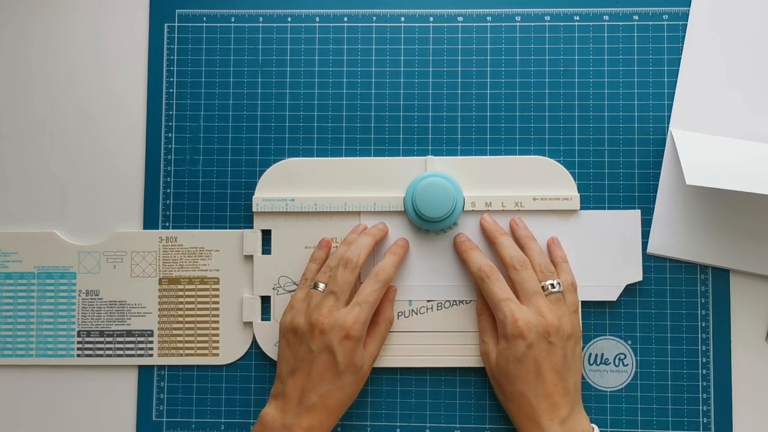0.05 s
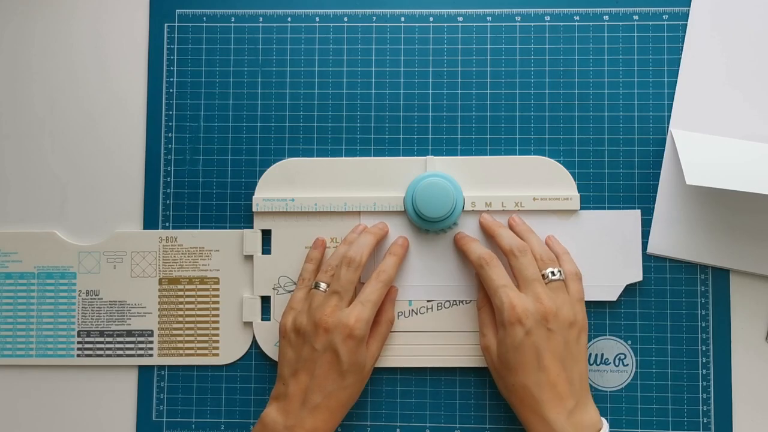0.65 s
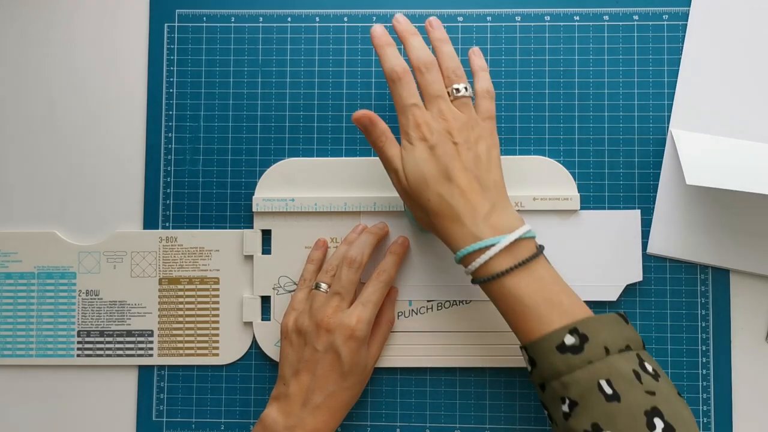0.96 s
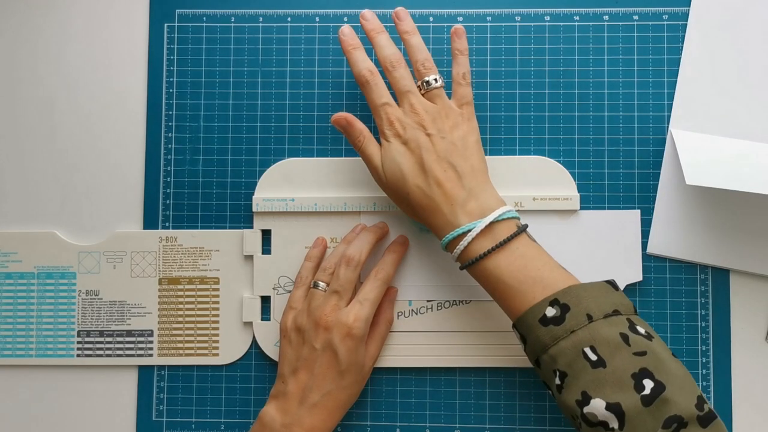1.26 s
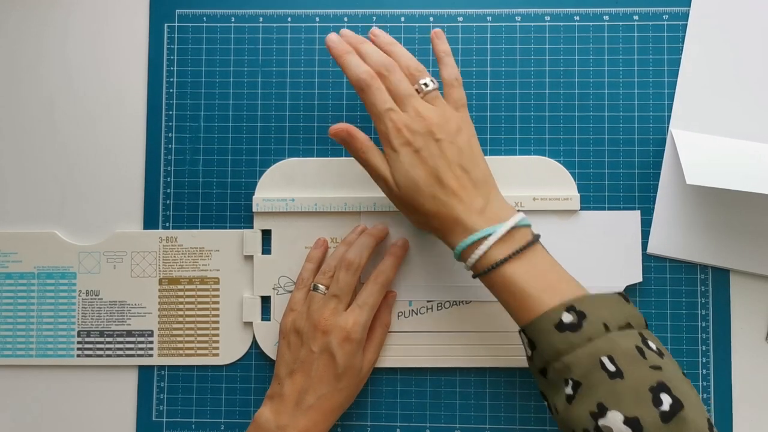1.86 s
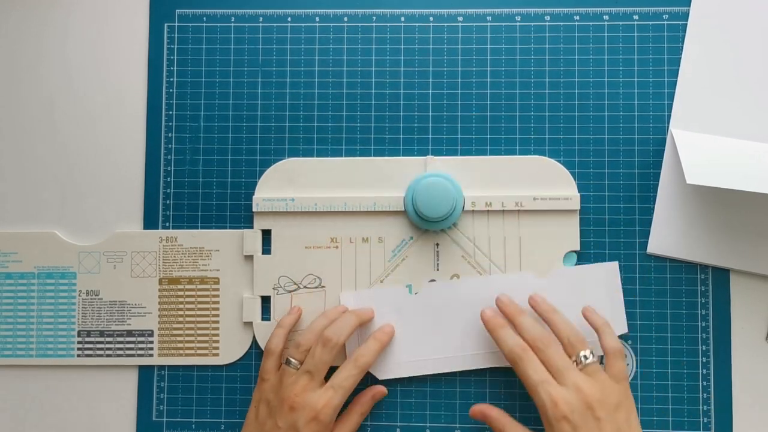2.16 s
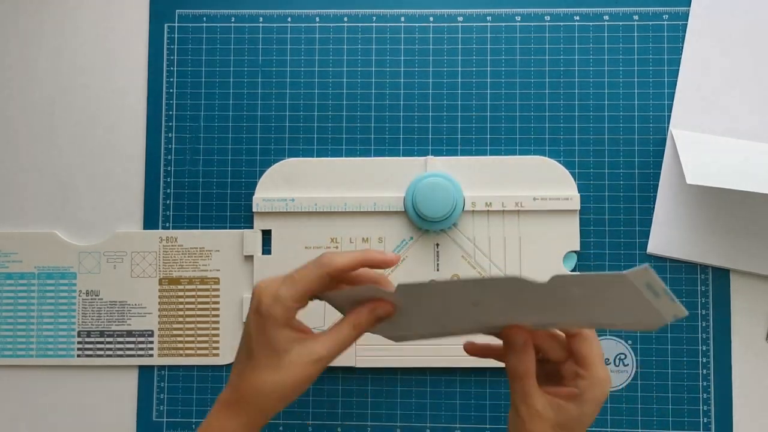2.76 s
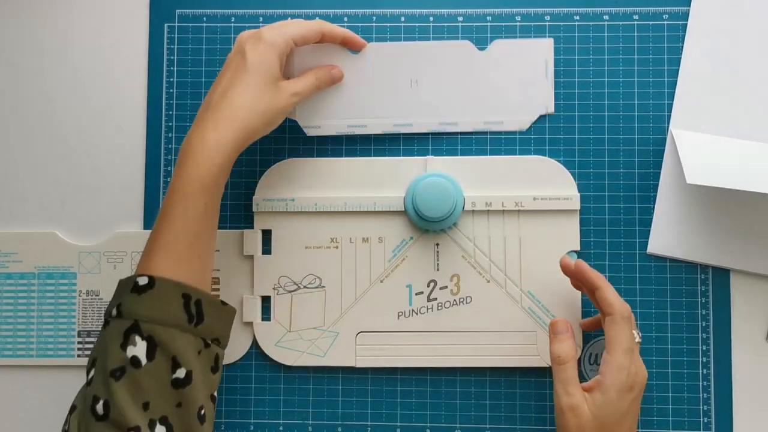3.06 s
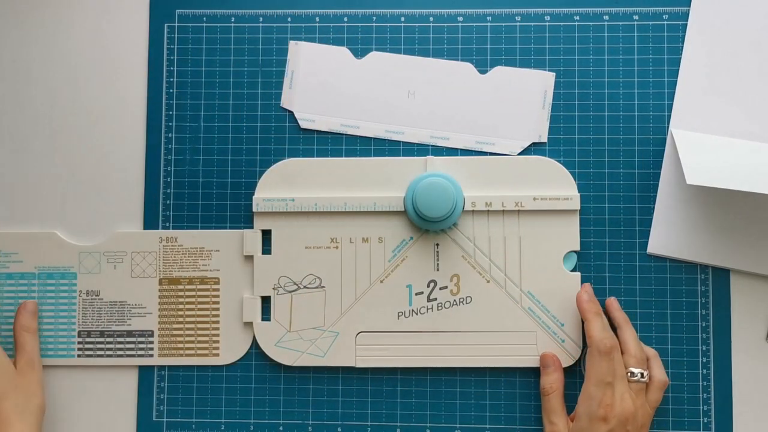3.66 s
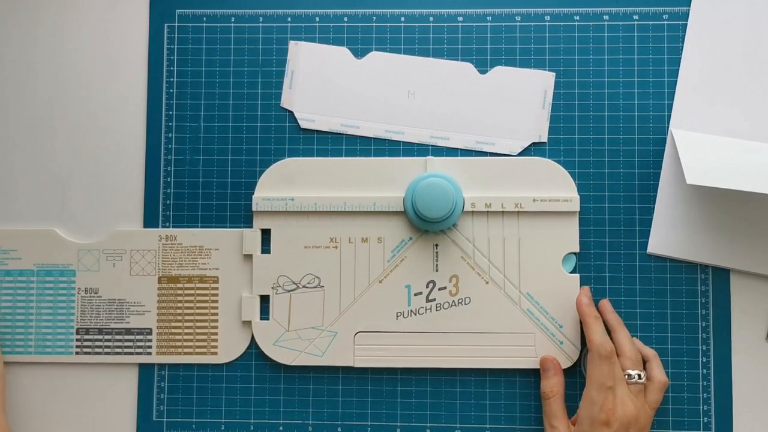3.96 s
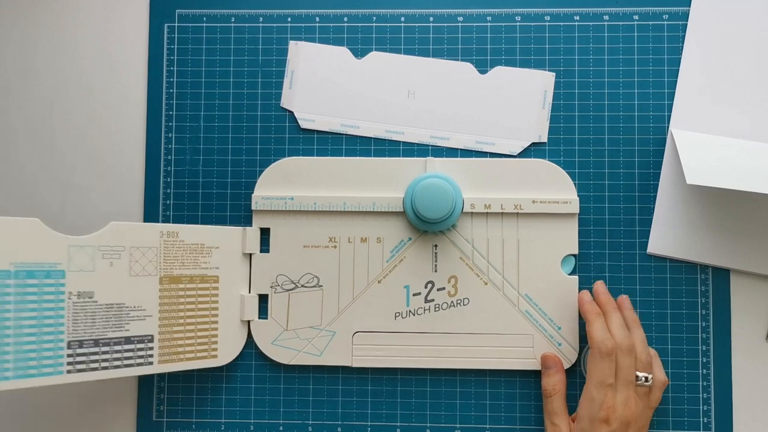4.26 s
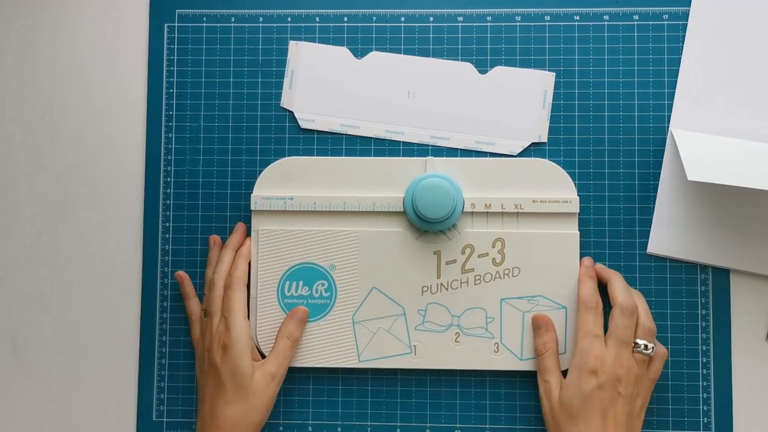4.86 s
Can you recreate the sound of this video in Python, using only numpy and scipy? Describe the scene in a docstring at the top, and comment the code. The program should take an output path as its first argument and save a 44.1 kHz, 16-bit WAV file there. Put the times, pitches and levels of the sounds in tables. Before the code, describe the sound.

A sharp plastic punch snap and table thump, followed by sliding paper and a lid clapping and clicking closed.

```python
"""A plastic craft punch board on a table in a small room, heard from close above, over a faint motor hum.
The punch is pressed and snaps through cardstock (1.7 s): a click, a ring of the board, a table thump.
A spring throws its hollow button back (2.0 s). The card slides out, is laid down and pushed along the
mat (2.1-3.4 s), hissing and scraping as its fibres catch. The hinged flap is swung over, claps shut
(4.7 s) and clicks into its catch (4.8 s)."""
import sys
import numpy as np
from scipy import signal
from scipy.fft import rfft, irfft
from scipy.io import wavfile

SR = 44100
rng = np.random.default_rng(int(sys.argv[2]) if len(sys.argv) > 2 else 0)


def wav_record(signal):
    """Record a signal, one row per channel, as 16-bit PCM in the file named by sys.argv[1]."""
    frames = np.transpose(np.atleast_2d(signal))
    bounded = np.clip(frames, -1, 1)
    # unit amplitude maps onto the largest positive 16-bit level
    quanta = np.round(bounded * 32767).astype(np.int16)
    wavfile.write(sys.argv[1], SR, quanta)


N = 225703
TIME_S = np.arange(N) / SR
HIT_TIME_S = TIME_S[:SR // 2]

# room tone: f/Hz, relative density/dB
AIR_SPECTRUM = [(12, -35), (20, -5.5), (37, 1.5), (88, -14.5), (101, -4.5), (123, -13), (241, -16.5),
                (262, -18.5), (301, -16.5), (446, -21.5), (527, -20), (873, -26.5), (1370, -34.5),
                (1610, -34), (16000, -58)]
# distant motor: f/Hz, level/dB
MOTOR_HUM = [(118.4, -63.5), (177.6, -70.5), (301.5, -80)]
# reverberation decay: f/Hz, t60/s
REVERB_T60 = [(100, 0.38), (400, .5), (1500, 0.49), (5000, 0.18), (9000, 0.55), (15000, 0.32)]
# reverberation colour: f/Hz, relative density/dB
REVERB_SPECTRUM = [(60, -8.5), (150, -7), (400, -1.5), (900, -6.5), (1500, -2.5), (2300, -1), (5000, 0.5),
                   (10000, -8), (16000, 6)]
# left-right coherence of room, clicks and ticks: f/Hz, coherence
ROOM_COHERENCE = [(25, 0.26), (70, 0.62), (200, 0.89), (500, 0.58), (1000, 0.071), (2000, 0.08),
                  (15000, 0.034)]
CLICK_COHERENCE = [(400, 0.85), (1500, 0.35), (8000, 0.26)]
TICK_COHERENCE = [(1000, 0.25), (8000, 0.2)]
# microphone port resonances: f/Hz, left/dB, right/dB
MIC_PORTS = [(3230, 3.5, 2), (5030, 4, 5), (6300, -4.5, -1.5), (7035, 3.5, 0.5), (8000, -7.5, 6),
             (8660, -3.5, -4.5), (9700, 4, -7.5), (10710, 7.5, -4.5), (13000, -3.5, -8.5), (16000, -2, -12)]
# slow waver of the hum: f/Hz, relative density/dB
WAVER_SPECTRUM = [(1, 0), (6, -6), (30, -60), (100, -120)]
# card and hands sliding on plastic: f/Hz, relative density/dB
HISS_SPECTRUM = [(400, -19.5), (1500, -15.5), (3000, -17.5), (5000, -10), (7500, 1.5), (10500, 3.5),
                 (13000, -0.5), (16000, -12)]
# card bending and scraping on the mat: f/Hz, relative density/dB
SCRAPE_SPECTRUM = [(300, 1), (900, -2), (1600, -4), (2700, -4.5), (4500, -5), (6500, -10.5), (15000, -16)]
# hands between strokes: t/s, level/dB
HAND_RUSTLE = [(.6, -105), (.8, -82), (1.3, -84), (1.85, -61.5), (2.3, -69), (2.8, -73), (3.1, -79),
               (3.9, -79), (4.6, -78.5), (5.1, -71.5)]
# strokes of card, hands and flap: peak t/s, rise/s, fall/s, hiss/dB, scrape/dB, left minus right/dB
RUB_STROKES = [ (.82, 0.19, .65, -76.5, -80.5, -7.5), (1.42, 0.047, 0.71, -73, -79, -6),
               (1.645, 0.086, 0.17, -64, -65.5, -0.5), (2.16, 0.17, 0.23, -57, -84, 1.5),
               (2.427, .13, 0.065, -54.5, -58.5, 0), (2.515, 0.045, 0.082, -65.5, -71, 2.5),
               (2.672, 0.097, 0.022, -69, -60.5, -1.5), (2.92, 0.055, .08, -69, -73, -4),
               (3.28, 0.19, 0.2, -66, -59, 0), (3.409, .11, 0.067, -58.5, -69.5, -3),
               (4.081, .09, .13, -78.5, -91, -5), (4.21, .08, 0.03, -71.5, -72.5, -1.5),
               (4.42, .12, .15, -74, -72.5, 2), (4.81, 0.045, 0.067, -64.5, -66, 0)]
# ticks and squeaks of card and plastic: t/s, level/dB, f/Hz, t60/s
EDGE_TICKS = [(1.344, -61.5, 1850, .045), (2.346, -70, 4500, .022), (2.58, -58.5, 2660, 0.39),
              (2.722, -54.5, 3450, 0.02), (2.857, -62, 2800, 0.027), (3.24, -54.5, 2430, 0.16),
              (3.29, -44.5, 4450, 0.05), (3.4228, -36, 4060, 0.023), (4.379, -58.5, 3030, 0.083)]
# table top under the mat: f/Hz, relative level/dB, t60/s
TABLE_MODES = [(71.9, -25.5, 0.57), (116, -16, 0.053), (136.9, -1, 0.16), (154.4, 5, 0.13),
               (173.6, -2, 0.16), (208, -6, 0.15), (242.6, -14, 0.26)]
# plastic board: f/Hz, relative level/dB, base t60/s
BOARD_MODES = [(268.6, -8, 0.55), (325.2, -8.5, 0.33), (369.9, -2.5, 0.17), (450, -9.5, 0.22),
               (531.1, 0, 0.1), (637, 2.5, 0.062), (685, 0, 0.041), (785.7, -4, 0.17), (877.6, 1, 0.17),
               (1020, 2, 0.076), (1135, -4.5, 0.13), (1170, -3.5, 0.12), (1388, -6.5, 0.19),
               (1541, -8.5, .1), (1650, -3, 0.068), (1810, -6, 0.036), (2018, -4.5, 0.12),
               (2660, -4.5, 0.048), (2970, -7.5, 0.07)]
# the board's dense, short-lived modes: f/Hz, relative density/dB
CLICK_SPECTRUM = [(40, -46.5), (150, -28.5), (300, -10), (650, -2.5), (1100, 4.5), (1750, 1), (2300, -1),
                  (3000, -0.5), (4500, -4), (6500, -4.5), (9000, -7), (13000, -10), (16000, -18.5)]
# board rocking, card touching down, flap chattering: t/s, level/dB, centre f/Hz, t60 factor
SOFT_KNOCKS = [ (1.716, -24, 374, 0.85), (1.942, -39.5, 860, 0.97), (2.041, -35, 310, 0.72),
               (2.646, -57, 895, 1.3), (2.923, -53, 612, 0.55), (3.169, -47.5, 830, 1.3),
               (3.286, -47, 260, 1.2), (4.379, -46.5, 990, .98), (4.6635, -22, 545, 0.77),
               (4.672, -29.5, 600, 1.13), (4.703, -21.5, 914, 0.52), (4.848, -33, 990, .9),
               (4.871, -31.5, 394, 0.54), (5.035, -37.5, 887, 0.36)]
# hollow button: f/Hz, relative level/dB, t60/s
BUTTON_MODES = [(620, -20, 0.12), (793.5, 3, 0.16), (1004, 6.5, 0.031), (1286, -25.5, 0.28),
                (1840, 3, 0.057), (2250, -30, 0.0687), (2920, -46, 0.077)]
# button hitting its stop: t/s, level/dB
BUTTON_HITS = [(1.9635, -42), (1.969, -34.5)]
# punch, button, card, hinge, flap, catch: t/s, click/dB, tilt/(dB/octave), contact/s, thump/dB
HARD_BLOWS = [ (1.402, -65, 7, 0.0014, -43), (1.613, -56.5, 4.5, 0.0015, -35),
              (1.6699, -25, -2.5, 0.002, -25.5), (1.6806, -17.5, -2.5, .0008, -11.5),
              (1.963, -31, 2.4, 0.00031, -25), (2.325, -53.5, 8, 0.0041, -44),
              (2.896, -53.5, -0.5, .001, -43), (3.163, -51, -1, 0.0017, -47.5),
              (3.7459, -37, 2.5, 0.00021, -33.5), (4.668, -40, -1.5, 0.02, -24.5),
              (4.692, -41.5, -2, 0.0081, -57), (4.705, -32.5, -2.5, 0.012, -24.5),
              (4.843, -33.5, 0.6, 0.0011, -25)]


def from_db(db):
    """Decibels to gain."""
    return 10 ** (np.asarray(db) / 20)


def at_hz(points, hz):
    """Interpolate on a log-frequency axis."""
    point_hz, value = np.transpose(points)
    return np.interp(np.log(np.maximum(hz, 1)), np.log(point_hz), value)


def fade(t_s, t60_s):
    """Exponential decay, 60 dB down at t60_s."""
    return np.exp(-np.log(1000) * t_s / t60_s)


def add(out, start_s, sound):
    """Mix a sound in at start_s."""
    i = round(start_s * SR)
    out[:, i:i + sound.shape[-1]] += sound[..., :N - i]


def noise(spectrum, size, coherence=ROOM_COHERENCE, tilt_db_oct=0):
    """Coloured stereo noise, rms 1, tilted above 600 Hz."""
    hz = np.fft.rfftfreq(size, 1 / SR)
    mid, side = rfft(rng.standard_normal((2, size)))
    alike = at_hz(coherence, hz)
    stereo = np.sqrt(1 + alike) * mid + np.sqrt(1 - alike) * side * [[1], [-1]]
    gain = from_db(at_hz(spectrum, hz) + tilt_db_oct * np.log2(np.maximum(hz / 600, 1)))
    x = irfft(gain * stereo, size)
    return x / x.std()


def ring(modes, weights, spread_rad, scatter_db=1.5):
    """Struck modes, varying per hit; higher ones reach left and right out of phase."""
    hz, db, t60_s = np.transpose(modes)[:, :, None]
    strength, lean = rng.standard_normal((2, len(modes), 1))
    envelopes = weights * from_db(db + scatter_db * strength) * fade(HIT_TIME_S, t60_s)
    phase_rad = 2 * np.pi * hz * HIT_TIME_S
    offset_rad = spread_rad * np.sign(lean) * np.tanh(hz / 1200)
    return np.array([(envelopes * np.sin(phase_rad + side * offset_rad)).sum(axis=0) for side in (1, -1)])


def background(air_db=-58.5, waver_depth=0.083):
    """Room tone and a distant motor, wavering in phase and level."""
    waver = waver_depth * noise(WAVER_SPECTRUM, N)[0]
    hum = sum(from_db(db) * np.sqrt(2) * np.sin(2 * np.pi * hz * TIME_S + waver) for hz, db in MOTOR_HUM)
    return from_db(air_db) * noise(AIR_SPECTRUM, N) + hum * (1 + waver)


def reverb(x, wet_db=-6, gap_s=0.0081, build_s=0.0032):
    """Diffuse reflections; each octave decays at its own rate."""
    t_s = TIME_S[:SR * 3 // 4]
    bins_hz = np.fft.rfftfreq(len(t_s), 1 / SR)
    octaves_hz = np.geomspace(125, 16000, 8)
    wash = rfft(noise(REVERB_SPECTRUM, len(t_s)))
    tail = np.zeros((2, len(t_s)))
    for hz, one_hot in zip(octaves_hz, np.eye(len(octaves_hz))):
        band_gain = at_hz(list(zip(octaves_hz, one_hot)), bins_hz)
        tail += irfft(wash * band_gain, len(t_s)) * fade(t_s, at_hz(REVERB_T60, hz))
    tail *= np.clip((t_s - gap_s) / build_s, 0, 1)
    tail /= np.sqrt((tail ** 2).sum() / 2)
    return from_db(wet_db) * signal.fftconvolve(x, tail, axes=1)[:, :N]


def mic_ports(x):
    """The two microphone ports resonate at different pitches."""
    ports, hz = np.array(MIC_PORTS), np.fft.rfftfreq(N, 1 / SR)
    gain = from_db([at_hz(ports[:, [0, side]], hz) for side in (1, 2)])
    return irfft(rfft(x) * gain, N)


def friction(spectrum, catches_per_s, burst_share, burst_s):
    """Paper fibres catch and release: uneven bursts on smooth noise."""
    catches = (rng.random(N) < catches_per_s / SR) * np.minimum(rng.exponential(1, N), 4) ** 2
    bursts = signal.lfilter([1], [1, -np.exp(-1 / (burst_s * SR))], catches + 1e-18)
    power = 1 - burst_share + burst_share * bursts / bursts.mean()
    return np.sqrt(power) * noise(spectrum, N)


def rubbing(edge_loss_db=24, roundness=1.25, rustle_hiss_db=-12):
    """Hiss and scrape swell with each stroke's speed, over the rustle of the hands."""
    scrape_power = from_db(np.interp(TIME_S, *np.transpose(HAND_RUSTLE))) ** 2
    hiss_power = scrape_power * from_db(rustle_hiss_db) ** 2
    for peak_s, rise_s, fall_s, hiss_db, scrape_db, pan_db in RUB_STROKES:
        from_peak = np.maximum((peak_s - TIME_S) / rise_s, (TIME_S - peak_s) / fall_s)
        pan = from_db([[pan_db / 2], [-pan_db / 2]])
        swell = pan * from_db(-edge_loss_db * np.clip(from_peak, 0, 10) ** roundness)
        hiss_power = hiss_power + (from_db(hiss_db) * swell) ** 2
        scrape_power = scrape_power + (from_db(scrape_db) * swell) ** 2
    hiss = friction(HISS_SPECTRUM, catches_per_s=900, burst_share=0.4, burst_s=0.001)
    scrape = friction(SCRAPE_SPECTRUM, catches_per_s=450, burst_share=0.6, burst_s=0.002)
    return np.sqrt(hiss_power) * hiss + np.sqrt(scrape_power) * scrape


def ticks(skirt_db=-21, floor_db=-29, rise_share=0.03):
    """An edge slips and flutters in one broad resonance; longer flutters start softer."""
    out = np.zeros((2, N))
    for start_s, db, hz, t60_s in EDGE_TICKS:
        spectrum = [(hz / 4, floor_db), (hz / 2, skirt_db), (hz * 0.9, 0),
                    (hz, 0), (hz * 1.8, skirt_db), (hz * 3, floor_db)]
        envelope = np.minimum(HIT_TIME_S / (rise_share * t60_s), 1) * fade(HIT_TIME_S, t60_s)
        add(out, start_s, from_db(db) * envelope * noise(spectrum, len(HIT_TIME_S), TICK_COHERENCE))
    return out


def table_thump(rise_s=0.02):
    """The heavy table top takes a few cycles to get moving."""
    return (1 - np.exp(-HIT_TIME_S / rise_s)) * ring(TABLE_MODES, weights=0.886, spread_rad=0.65)


def board_ring(centre_hz, octave_loss_db, t60_factor, contact_s):
    """The contact favours modes near centre_hz; hands and mat set the damping."""
    modes = [(hz, db - octave_loss_db * np.log2(hz / centre_hz) ** 2, t60_s * t60_factor)
             for hz, db, t60_s in BOARD_MODES]
    signs = rng.choice([-1, 1], (len(modes), 1))   # mode polarity at the struck spot
    return np.minimum(HIT_TIME_S / contact_s, 1) * ring(modes, signs, spread_rad=0.36)


def click(tilt_db_oct, contact_s, crack_t60_s=0.052, rattle_t60_s=0.27, rattle_db=-14):
    """A crack builds as surfaces meet; the plastic's dense modes leave a duller rattle."""
    t_s = np.maximum(HIT_TIME_S - contact_s, 0)
    crack = fade(t_s, crack_t60_s) * noise(CLICK_SPECTRUM, len(t_s), CLICK_COHERENCE, tilt_db_oct)
    rattle = fade(t_s, rattle_t60_s) * noise(CLICK_SPECTRUM, len(t_s), CLICK_COHERENCE, tilt_db_oct - 1.5)
    return np.minimum(HIT_TIME_S / contact_s, 1) * (crack + from_db(rattle_db) * rattle)


def knocks(contact_s=0.0026, click_db=-16.5, ring_db=-6):
    """Soft contacts ring a few board modes and barely click."""
    out = np.zeros((2, N))
    for start_s, db, centre_hz, t60_factor in SOFT_KNOCKS:
        tap = click(tilt_db_oct=-6, contact_s=contact_s)
        board = board_ring(centre_hz, octave_loss_db=21, t60_factor=t60_factor, contact_s=contact_s)
        add(out, start_s, from_db(db) * (from_db(click_db) * tap + from_db(ring_db) * board))
    return out


def button():
    """The spring throws the button against its stop; its cup rings with a hollow pock."""
    out = np.zeros((2, N))
    for start_s, db in BUTTON_HITS:
        signs = rng.choice([-1, 1], (len(BUTTON_MODES), 1))
        add(out, start_s, from_db(db) * ring(BUTTON_MODES, signs, spread_rad=0.44))
    return out


def blows(ring_db=-11):
    """Hard contacts click, ring the whole board and shake the table."""
    out = np.zeros((2, N))
    for start_s, click_db, tilt_db_oct, contact_s, thump_db in HARD_BLOWS:
        board = board_ring(centre_hz=540, octave_loss_db=0.5, t60_factor=1.1, contact_s=contact_s)
        plastic = click(tilt_db_oct, contact_s) + from_db(ring_db) * board
        add(out, start_s, from_db(click_db) * plastic + from_db(thump_db) * table_thump())
    return out


def scene():
    """Board and card with reverb, through the microphone ports, over the background."""
    direct = rubbing() + blows() + knocks() + button() + ticks()
    return mic_ports(direct + reverb(direct)) + background()


def record(dry, cutoff_hz=15900):
    """Steep elliptic low-pass."""
    return signal.sosfilt(signal.ellip(10, 0.2, 80, cutoff_hz, fs=SR, output="sos"), dry)


dry = scene()
out = record(dry)
wav_record(out)
```